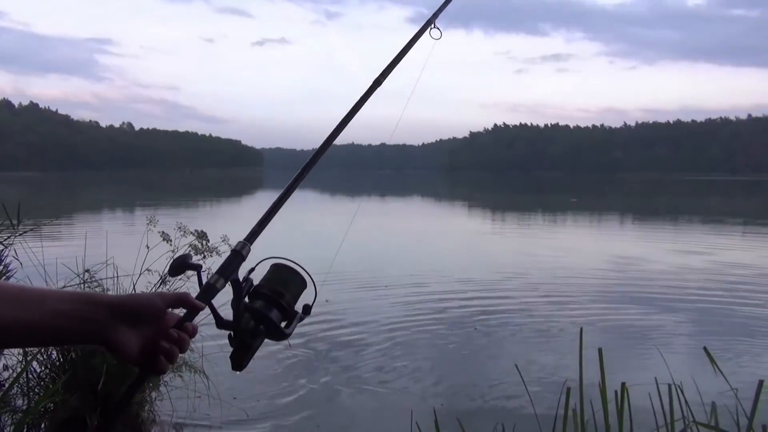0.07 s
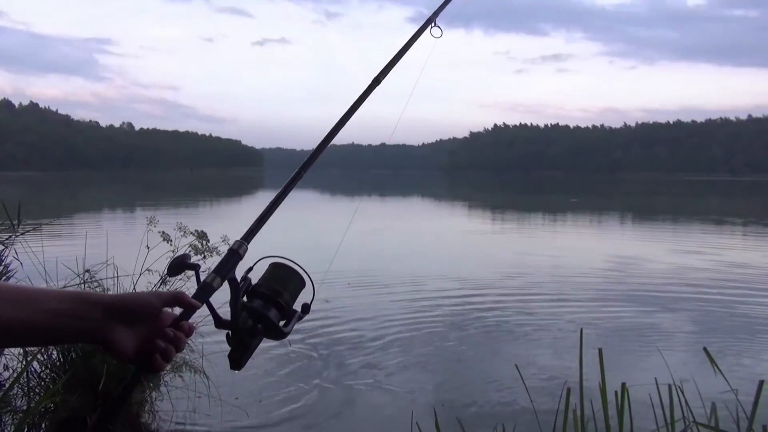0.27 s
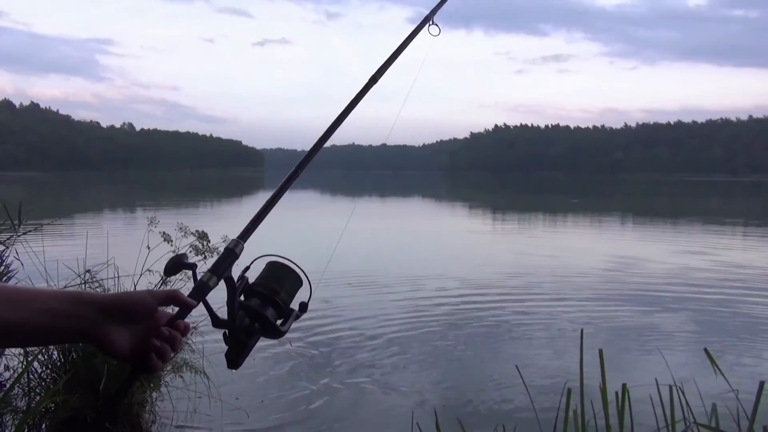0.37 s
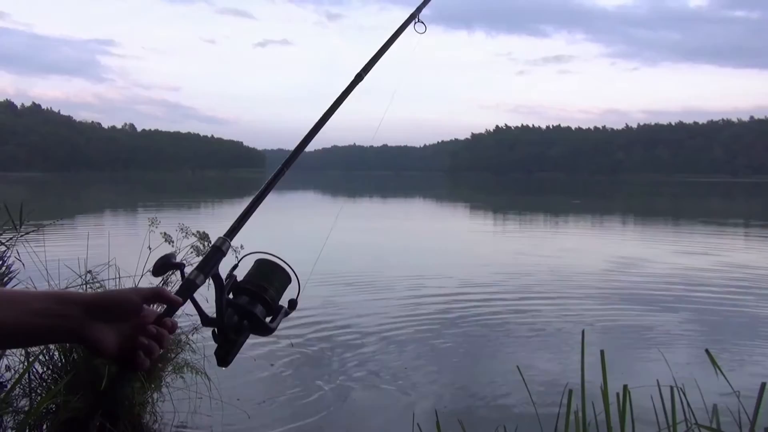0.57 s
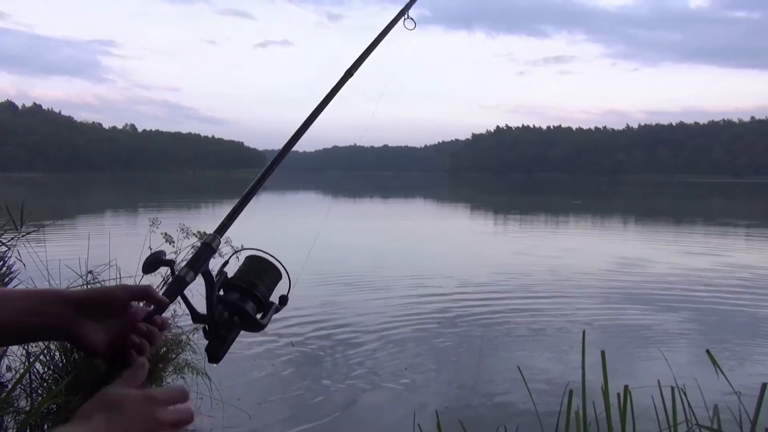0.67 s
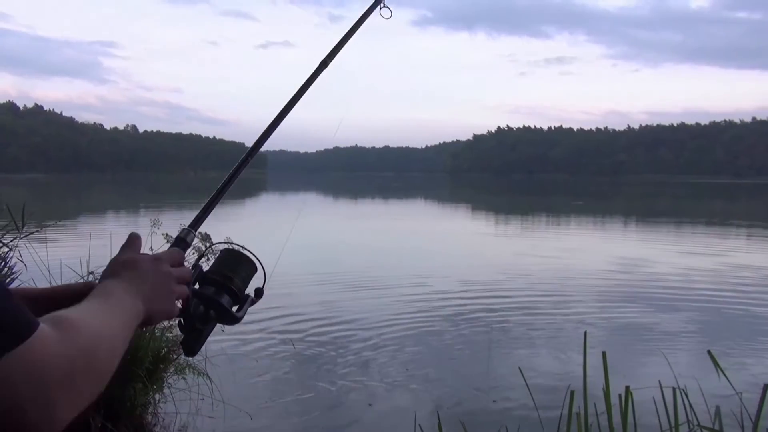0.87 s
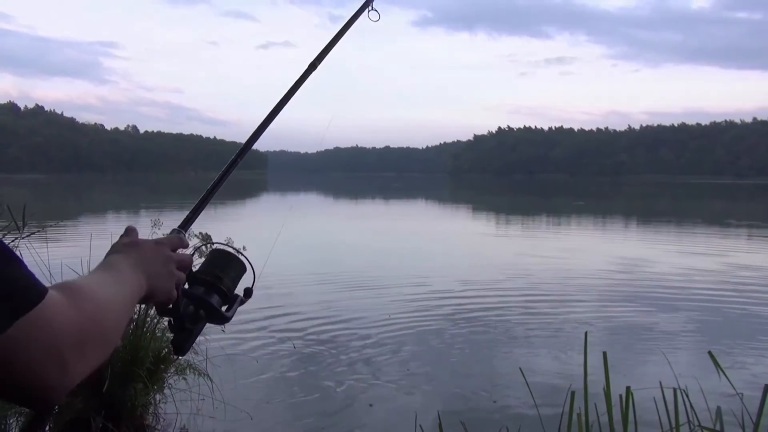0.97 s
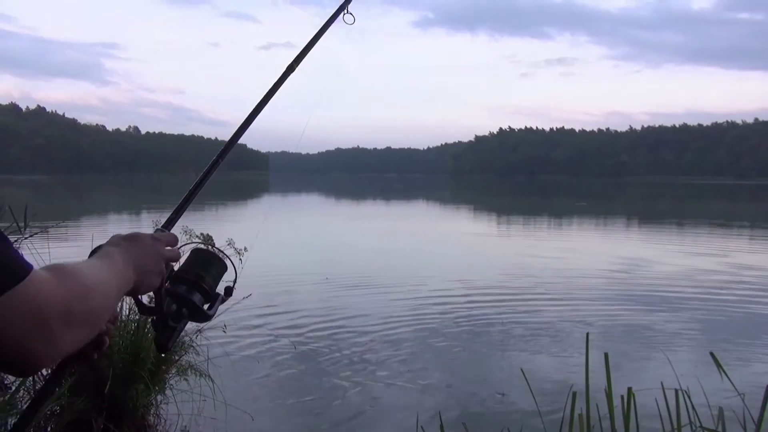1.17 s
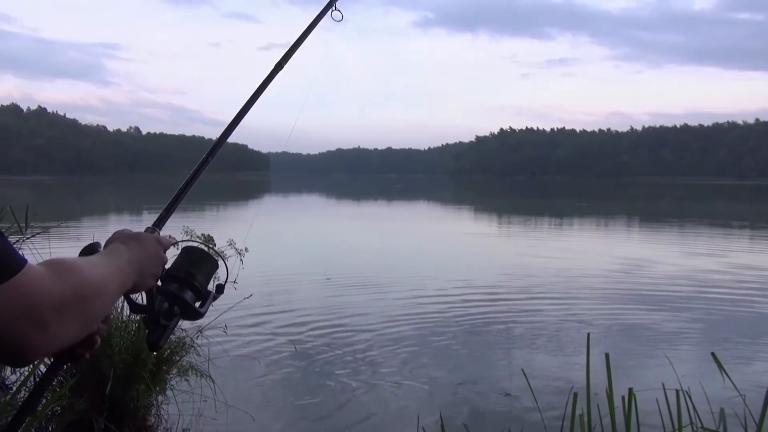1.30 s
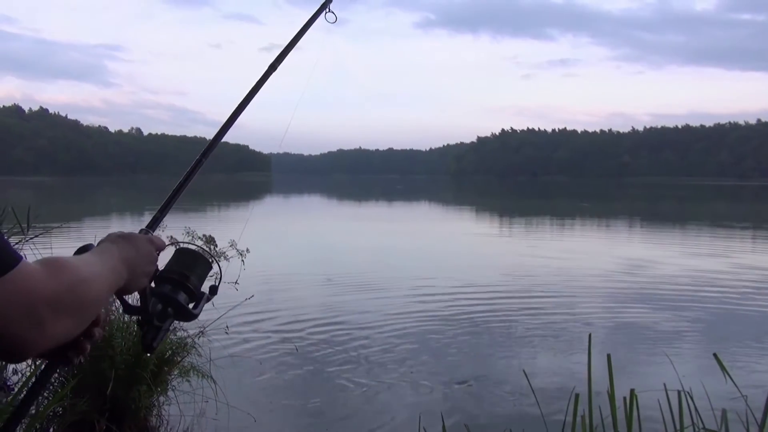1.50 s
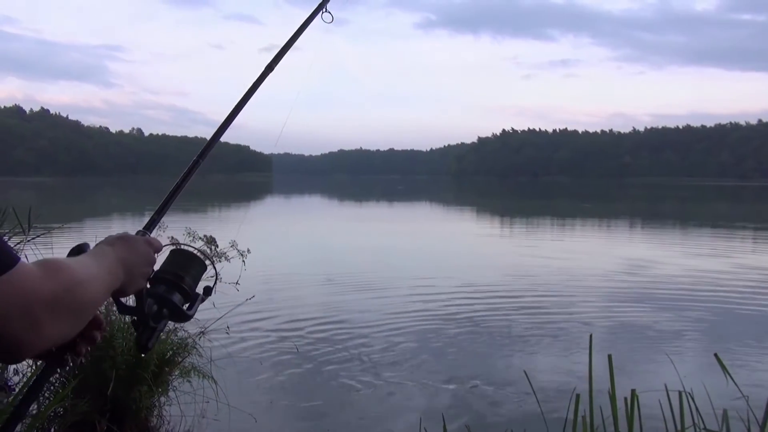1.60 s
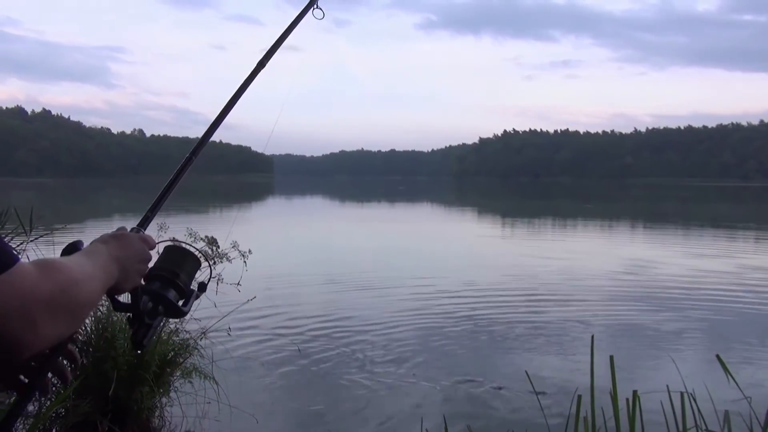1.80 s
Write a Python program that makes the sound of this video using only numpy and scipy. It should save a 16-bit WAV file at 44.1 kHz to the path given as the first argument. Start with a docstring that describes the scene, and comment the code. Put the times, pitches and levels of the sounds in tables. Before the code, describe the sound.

Close knocks, light ticks and one metallic snap from handled fishing gear, over soft outdoor hiss.

```python
"""Fishing on a still lake at dusk

An angler shifts his grip on a rod and reel close to the microphone. Under an even hiss, bumps set a hollow body
ringing in three knocks, and the reel's catch strikes metal in one sharp snap. Handled tackle ticks and rustles,
and tiny ringing bubbles make faint plips of water."""
import sys
import numpy as np
from scipy import signal
from scipy.fft import rfft, irfft
from scipy.io import wavfile
from scipy.ndimage import uniform_filter1d

SR = 44100
rng = np.random.default_rng(int(sys.argv[2]) if len(sys.argv) > 2 else 0)


def persist_wave(psi):
    """Save psi, clipped to +-1, as 16-bit WAV."""
    counts = np.round(np.clip(psi, -1, 1) * 32767).astype(np.int16)
    wavfile.write(sys.argv[1], SR, np.atleast_2d(counts).T)


N = 81585
TIME = np.arange(N) / SR

# The tone of the hiss: pitch_hz, relative_db
HISS_TONE = [(25, -24.5), (60, -18), (130, -16), (250, -8), (400, -4.5), (650, -4), (760, 1.3), (835, 4.5),
             (930, 0.3), (1050, 1.5), (1200, -2), (1600, -1.5), (2300, -3), (3200, 1.5), (4500, 0.9),
             (5200, -3.5), (5850, -3), (6350, -11.5), (7500, -9), (9000, -6.5), (9700, -8.5), (10300, -15),
             (13500, -15), (15500, -21)]
# How loud the hiss is over time: time_s, level_db
HISS_LOUDNESS = [(0, -54.8), (.4, -55), (.67, -54.5), (.8, -55.5), (1.1, -55.5), (1.3, -55.5), (1.6, -56.5),
                 (1.85, -55)]
# The hiss's stereo spread, compared with its centre: pitch_hz, relative_db
HISS_SPREAD = [(30, -10), (120, -19), (300, -19), (800, -15), (1500, -20), (3000, -44), (6000, -53.5),
               (12000, -45)]
# Bumps on a hollow body, in close pairs. A fade is the time taken to drop by 60 dB. # Scuff, thump and overtone
# are relative to the level. # start_s, level_db, scuff_db, pitch_hz, fade_s, thump_db, overtone_db
BUMPS = [(.0655, -47, -19, 854, .03, -42, -33), (0.103, -47, -5, 835, 0.03, -40, -25),
         (0.218, -29, -11, 806, 0.025, -23.5, -29), (0.2392, -22, -19, 835, 0.033, -36, -54),
         (0.2924, -41, -6, 880, 0.016, -40, -8), (0.3029, -27.5, -25, 852, 0.027, -41, -17)]
# The noise of surfaces scuffing in a bump: centre_hz, relative_db, width_hz
SCUFF_BANDS = [(1600, -5, 740), (3180, -2, 800), (4280, -1, 400), (5400, -7.5, 900)]
# The two strikes of the reel's catch: start_s, level_db, brightness_db_per_octave
CATCH_STRIKES = [(1.0314, -43.5, 7.5), (1.03275, -37.5, -3.5)]
# The notes the reel's metal rings at: pitch_hz, relative_db, fade_s
METAL_NOTES = [(1530, -24, 0.017), (3040, -13, 0.013), (3260, -3, 0.024), (3330, -5.5, 0.027),
               (3580, -12, 0.02), (5200, -8, 0.032), (5760, -10, .017), (8500, -7, 0.0084),
               (9760, -2.5, 0.009), (14200, -7, 0.008)]
# Light touches on the tackle: start_s, level_db, centre_hz, width_hz, fade_s, ring_db
TACKLE_TOUCHES = [(0.123, -49, 2300, 1190, 0.074, -45), (0.2875, -47.5, 1900, 900, 0.013, -54),
                  (0.3027, -41, 1850, 1000, 0.01, -63), (.348, -67, 4000, 3000, 0.014, -56),
                  (0.499, -48.5, 2000, 2400, 0.031, -46), (0.6477, -41, 4400, 1200, 0.0078, -72),
                  (.685, -49, 3660, 2500, 0.01, -60), (0.8674, -43.5, 1900, 2420, 0.011, -50),
                  (0.9632, -39.5, 1890, 1690, 0.0085, -49), (0.9686, -43, 2110, 900, 0.0061, -60),
                  (1.074, -43, 3040, 1990, .009, -49), (1.144, -48, 2220, 2400, 0.024, -54),
                  (1.4, -49.5, 1460, 2000, 0.03, -47), (1.416, -51, 2010, 3600, 0.032, -49),
                  (1.6872, -48, 1280, 890, 0.027, -41), (1.6876, -47.5, 3570, 900, 0.015, -70),
                  (1.7138, -50, 1300, 2500, 0.016, -43), (1.793, -49.5, 3550, 900, 0.016, -48),
                  (1.806, -53, 2500, 2400, 0.11, -54)]
# Bubbles in the water: start_s, level_db, pitch_hz, fade_s
BUBBLES = [(0.122, -39.5, 2320, 0.024), (1.065, -45, 1474, 0.058), (1.2485, -44, 2610, 0.033)]


def from_db(db):
    """Turn decibels into a number to multiply by."""
    return 10 ** (np.asarray(db) / 20)


def normalise(x):
    """Scale a signal to an average power of one."""
    return x / np.sqrt(np.mean(x ** 2) + 1e-20)


def shape_tone(x, points):
    """Filter a sound by a curve through (pitch_hz, gain_db) points."""
    hz, db = np.transpose(points)
    bin_hz = np.maximum(np.arange(N // 2 + 1) * SR / N, 1)
    return irfft(rfft(x) * from_db(np.interp(np.log(bin_hz), np.log(hz), db)), N)


def band(x, low_hz, high_hz):
    """Keep what lies between two pitches, with gentle edges."""
    return signal.sosfilt(signal.butter(2, [low_hz, high_hz], "band", fs=SR, output="sos"), x)


def age(start_s):
    """Seconds since the start, zero before it."""
    return np.maximum(TIME - start_s, 0)


def fade(start_s, fade_s):
    """A level that jumps to one, then drops 60 dB every fade_s."""
    return (TIME >= start_s) * np.exp(-np.log(1000) * age(start_s) / fade_s)


def ring(start_s, hz, fade_s, wave=np.cos):
    """One fading note: a cosine starts with a click, a sine more softly."""
    return wave(2 * np.pi * hz * age(start_s)) * fade(start_s, fade_s)


def even_noise(hz, width_hz):
    """Noise gathered around one pitch, with its level evened out."""
    radius = np.exp(-np.pi * width_hz / SR)
    resonance = [1, 0, -1, 1, -2 * radius * np.cos(2 * np.pi * hz / SR), radius ** 2]
    noise = normalise(signal.sosfilt([resonance, resonance], rng.standard_normal(N)))
    return noise / np.sqrt(uniform_filter1d(noise ** 2, size=90) + 1e-9)


def stereo(centre, spread):
    """Make left and right by adding and subtracting the spread."""
    return np.array([centre + spread, centre - spread])


def hiss():
    """The air and the microphone give an even hiss that wavers very slightly."""
    centre, spread = (normalise(shape_tone(noise, HISS_TONE)) for noise in rng.standard_normal((2, N)))
    below_20_hz = signal.butter(2, 20, fs=SR, output="sos")
    waver_db = 1.11 * normalise(signal.sosfilt(below_20_hz, rng.standard_normal(N)))
    level_db = np.interp(TIME, *np.transpose(HISS_LOUDNESS)) + waver_db
    return from_db(level_db) * stereo(centre, shape_tone(spread, HISS_SPREAD))


def water_plips():
    """Small bubbles ring briefly and rise in pitch."""
    rise_per_s, attack_s = 2.2, 0.00052   # the rise is relative to the starting pitch
    out = np.zeros(N)
    for start_s, db, hz, fade_s in BUBBLES:
        t = age(start_s)
        note = np.sin(2 * np.pi * hz * t * (1 + rise_per_s * t / 2))
        onset = 1 - np.exp(-t / attack_s)
        out += from_db(db) * note * onset * fade(start_s, fade_s)
    return out


def hollow_ring(start_s, db):
    """Even a light touch sets the hollow body ringing."""
    return from_db(db) * ring(start_s, hz=877, fade_s=0.0091)


def tackle_ticks():
    """Each touch makes a grainy tick, a trace of hollow ring and a short rustle."""
    out = np.zeros(N)
    for start_s, db, hz, width_hz, fade_s, ring_db in TACKLE_TOUCHES:
        tick = fade(start_s, fade_s)
        rustle = from_db(-15) * fade(start_s, fade_s=0.076)
        out += from_db(db) * even_noise(hz, width_hz) * (tick + rustle) + hollow_ring(start_s, ring_db)
    # A fast, random flutter in level makes the sound grainy.
    grain_db = 4.5 * normalise(uniform_filter1d(rng.standard_normal(N), size=20))
    return band(out * normalise(from_db(grain_db)), low_hz=200, high_hz=7100)


def reel_snap():
    """The catch cracks and strikes the reel's metal twice: first thin and bright, then fuller."""
    pivot_hz = 4970   # brightness leaves this pitch unchanged
    metal = np.zeros(N)
    for start_s, db, brightness in CATCH_STRIKES:
        for hz, note_db, fade_s in METAL_NOTES:
            level_db = db + note_db + brightness * np.log2(hz / pivot_hz) + rng.normal(0, 1)
            metal += from_db(level_db) * ring(start_s, hz, fade_s, wave=np.sin)
    first_s, first_db, _ = CATCH_STRIKES[0]
    crack = from_db(-47.5) * even_noise(hz=12000, width_hz=7000) * fade(first_s, fade_s=0.018)
    return band(metal + crack, low_hz=1100, high_hz=18000) + hollow_ring(first_s, first_db - 13)


def hollow_knocks():
    """Each bump scuffs, then a hollow body rings, with a low thump and a higher overtone."""
    scuff_rise_s, scuff_fade_s, echo_delay_s = 0.00083, 0.011, 0.0129
    centre, spread = np.zeros((2, N))
    scuff_noise = sum(from_db(db) * even_noise(hz, width_hz) for hz, db, width_hz in SCUFF_BANDS)
    for start_s, db, scuff_db, hz, fade_s, thump_db, overtone_db in BUMPS:
        lingering_note = from_db(-15) * ring(start_s, hz=785, fade_s=0.098)
        echo = from_db(-15) * ring(start_s + echo_delay_s, hz, fade_s)   # one nearby reflection
        body = band(ring(start_s, hz, fade_s) + lingering_note + echo, low_hz=330, high_hz=1360)
        thump = from_db(thump_db) * ring(start_s, hz=195, fade_s=0.1, wave=np.sin)
        overtone = from_db(overtone_db) * ring(start_s, hz=1588, fade_s=0.072, wave=np.sin)
        # The scuff swells just before the body rings.
        swell = np.exp(-np.maximum(start_s - TIME, 0) / scuff_rise_s)
        fall = np.exp(-np.log(1000) * age(start_s) / scuff_fade_s)
        scuff = from_db(scuff_db) * scuff_noise * swell * fall
        centre += from_db(db) * (body + thump + overtone + scuff)
        spread += from_db(db - 13) * band(body, low_hz=100, high_hz=hz)
    return stereo(centre, spread)


def scene():
    """The water and handling sounds sit in the middle of the hiss."""
    return hiss() + water_plips() + tackle_ticks() + reel_snap() + hollow_knocks()


def record(dry):
    """Cut away the very highest treble."""
    cutoff_hz = 15800
    return signal.sosfilt(signal.ellip(10, .1, 70, cutoff_hz, fs=SR, output="sos"), dry)


dry = scene()
out = record(dry)
persist_wave(out)
```